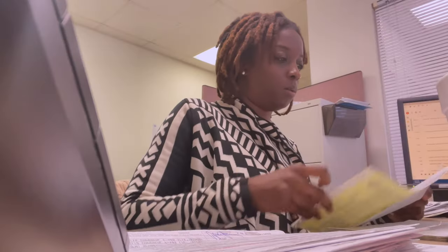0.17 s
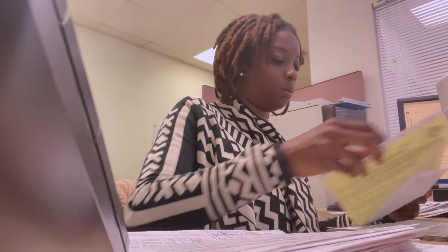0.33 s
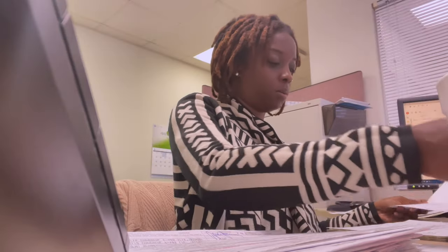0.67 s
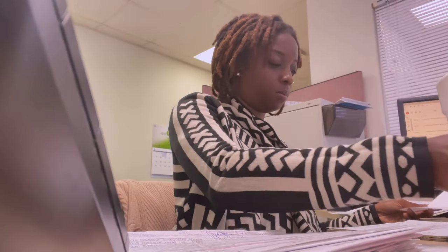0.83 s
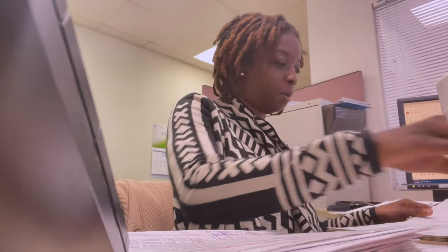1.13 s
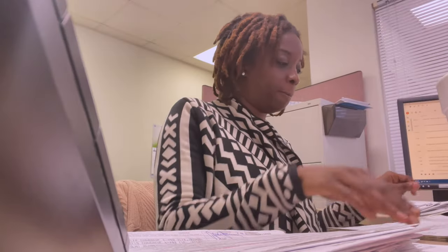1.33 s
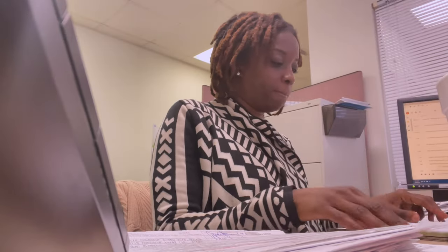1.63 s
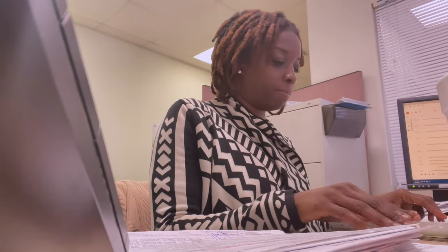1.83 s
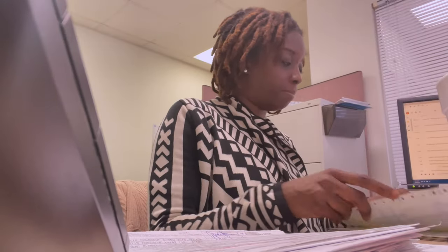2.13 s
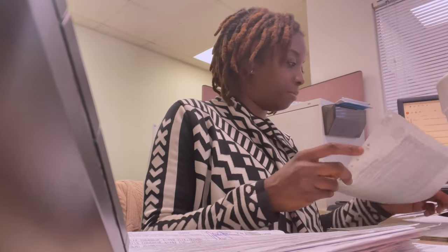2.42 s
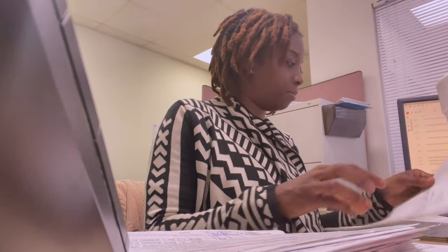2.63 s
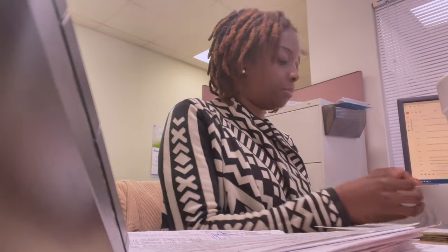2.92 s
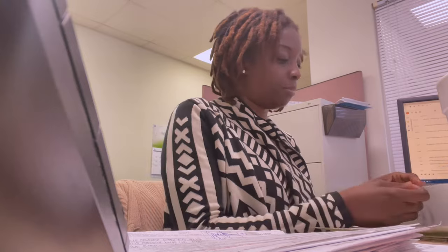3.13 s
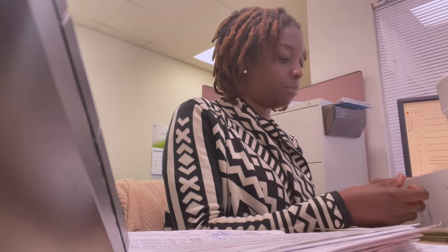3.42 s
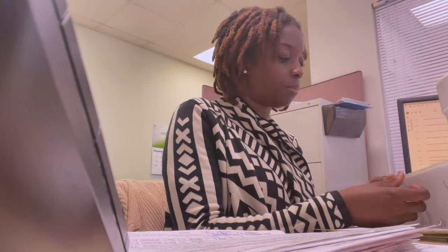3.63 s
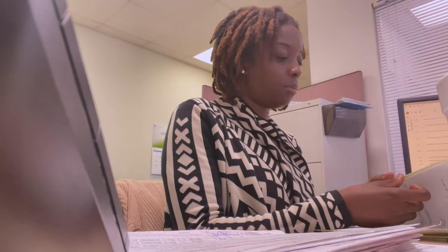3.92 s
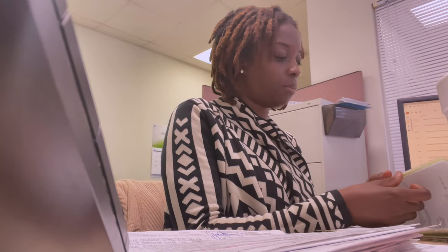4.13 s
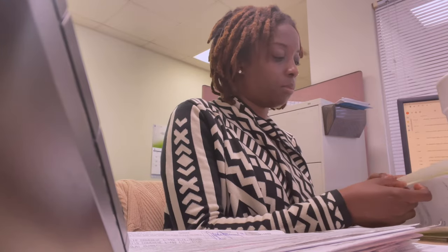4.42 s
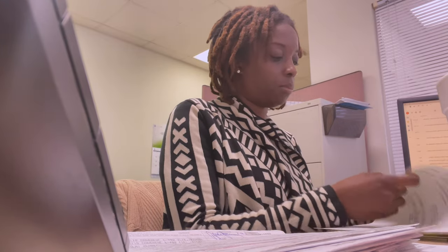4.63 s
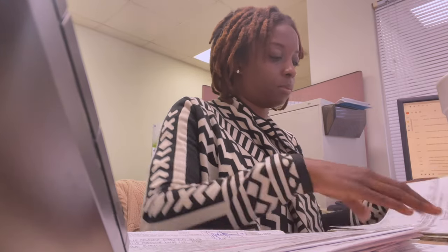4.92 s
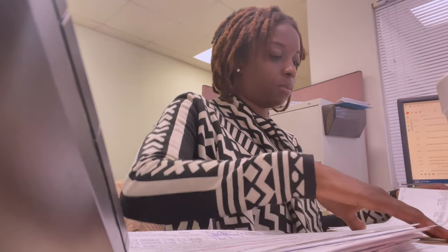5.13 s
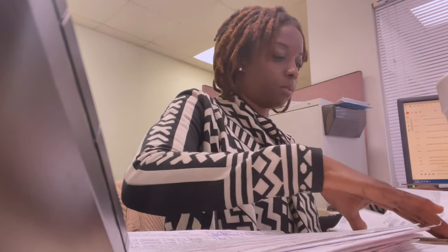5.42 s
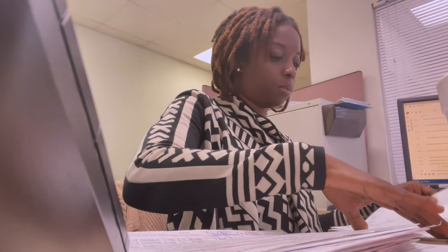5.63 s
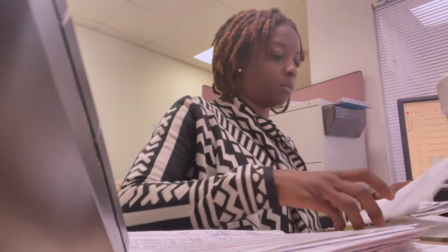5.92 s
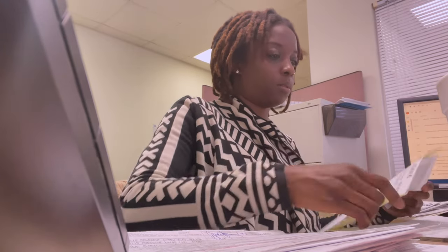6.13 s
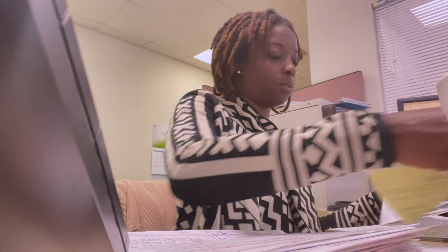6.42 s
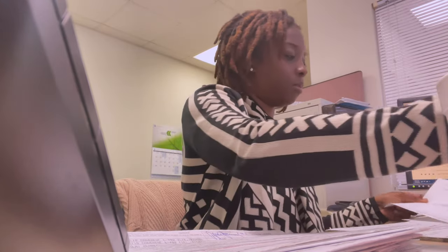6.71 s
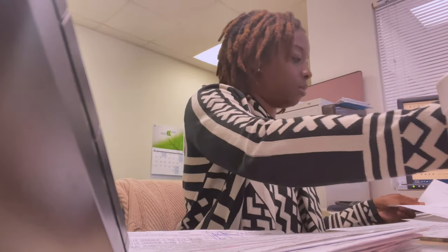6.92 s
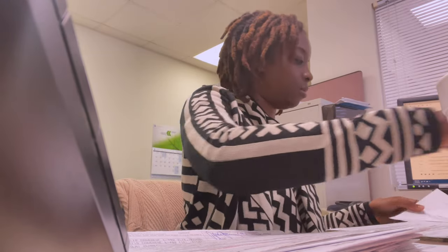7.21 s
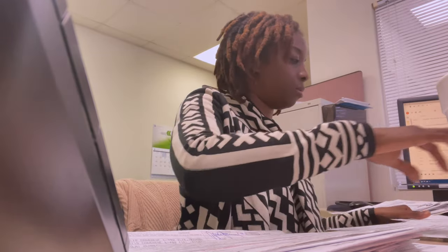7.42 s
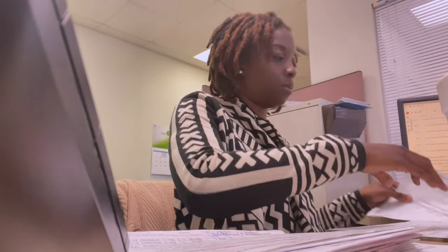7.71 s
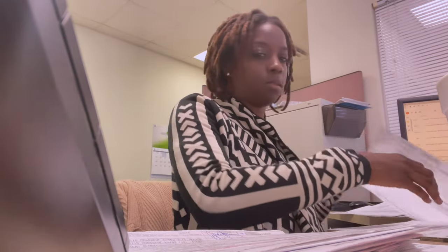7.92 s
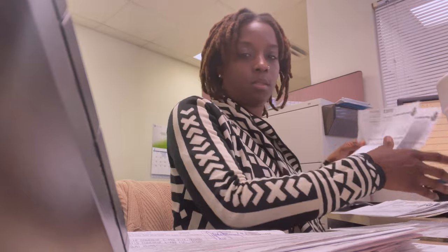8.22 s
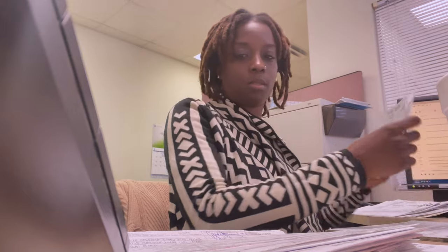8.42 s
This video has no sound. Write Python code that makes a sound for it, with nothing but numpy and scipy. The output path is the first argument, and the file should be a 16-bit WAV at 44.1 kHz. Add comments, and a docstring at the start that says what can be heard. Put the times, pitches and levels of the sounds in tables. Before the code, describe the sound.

Close dry rustling of papers being lifted and laid down, small taps and crease snaps, one loud stack thump, quiet office hum behind.

```python
"""Paper sheets, slid, lifted and dropped by hands on an office desk, close to a two-port microphone.
Filtered noise in sudden slips makes them crinkle, hiss and fizz, with the pile drumming under them;
short pulses make creases snap and edges tick, and the cubicle answers each with a short noise tail.
Once a sleeve sweeps over the desk; later a stack drops, and blows ring the damped modes of the pile.
Behind: ventilation as slowly breathing noise, mains hum and two far engines as drifting sines."""
import sys
import numpy as np
from scipy import signal
from scipy.fft import rfft, irfft, next_fast_len
from scipy.io import wavfile
from scipy.ndimage import uniform_filter1d

SR = 44100
rng = np.random.default_rng(int(sys.argv[2]) if len(sys.argv) > 2 else 0)


def transcribe(u):
    """Save the signal u as a 16-bit wav file named by the first command-line argument.

    u: samples, shape (n,) or (channels, n), limited to [-1, 1]; the rate is SR.
    q: integer samples, one column per channel.
    """
    v = np.clip(np.atleast_2d(u).T, -1, 1)
    q = np.round(v * 32767).astype(np.int16)
    wavfile.write(sys.argv[1], SR, q)


N = 377537

# Band limits between desk thud, pile drumming, crinkle, hiss and fine fizz: edge_hz
BAND_EDGES = [70, 250, 700, 2400, 5600, 15800]
# Colour of rubbed and bent paper: pitch_hz, density_db (per Hz, relative)
PAPER_COLOUR = [(60, 1.5), (250, -8), (420, -11), (560, -8), (900, -5.5), (2300, -14), (2900, -18),
                (4900, -20), (5900, -25.5), (7800, -27), (9000, -25.5), (11500, -26), (14000, -28),
                (15800, -31.5)]
# Broad resonances of the pile of sheets: pitch_hz, width_hz, lift_db
PILE_MODES = [(285, 30, 3), (378, 40, 10), (450, 40, 13), (650, 40, 3), (760, 30, 5)]
# Strokes of one sheet over another; rise and fall are the times for 20 dB:
# full_at_s, rise_s, hold_s, fall_s, hiss_db, fizz_db (re hiss), crinkle_db (re hiss)
STROKES = [(0.0, .05, 0, 0.18, -71.5, 1.5, -15), (0.188, 0.13, 0.26, 0.14, -62.5, -2, 0.5),
           (0.26, .01, 0, 0.073, -57.5, -14, -22), (0.53, .05, 0.032, 0.05, -70, -16, 13),
           (0.651, .005, 0, 0.046, -64.5, -2, -12), (0.671, 0.02, 0, 0.026, -49.5, -22, -20),
           (0.696, 0.075, 0.057, 0.12, -61.5, -7, -7), (0.93, .08, 0, 0.14, -66, -11, -3),
           (1.056, 0.11, 0.15, 0.075, -78, -11, 2), (1.153, .01, 0.0023, 0.053, -72.5, -3, 13),
           (1.184, 0.058, 0.037, 0.078, -74, -25, 4), (2.0, 0.14, 0.0085, 0.17, -59, -1, 1),
           (2.13, 0.19, 0.23, 0.035, -75.5, -3.5, 8.5), (2.32, 0.033, 0.015, 0.063, -76.5, -3, 18),
           (2.497, 0.036, 0.12, 0.033, -67.5, -6.5, 6.5), (2.773, 0.16, .02, 0.094, -72.5, 0, 14),
           (2.873, 0.024, 0.15, 0.058, -70, -2, 8), (3.215, 0.13, 0.061, 0.13, -76, -3.5, 5),
           (3.44, .12, 0.02, .05, -85, -9, 2), (3.42, .1, 0, 0.12, -88, -16, 5),
           (3.62, 0.037, 0.043, 0.13, -85, -19, 8), (4.15, 0.75, 0.0021, .4, -100, -1, 20.5),
           (4.435, 0.015, 0.1, 0.11, -73, 5.5, 12), (4.56, .02, 0.001, 0.044, -47.5, -25, 2),
           (4.624, .02, 0.06, 0.036, -68.5, -3, 14), (4.679, 0.14, 0.016, 0.034, -61, -2.5, 5),
           (4.755, 0.022, 0.049, 0.051, -72, 0, 13), (4.951, 0.045, 0.0024, 0.052, -81, -13, 18.5),
           (4.7, .03, 0.18, 0.62, -75, -1.5, 5.5), (5.022, 0.055, .06, 0.094, -72.5, 0, 5),
           (5.08, .004, 0, 0.069, -47, -0.5, -4), (5.158, .05, 0.11, 0.047, -70, -15, 4),
           (5.392, .004, 0, 0.065, -51.5, -14, -5), (5.711, 0.056, 0.0081, 0.16, -67.5, -4, 7),
           (5.8, 0.0091, 0.038, 0.066, -62.5, -21, -8), (6.047, 0.3, .04, .1, -73.5, -3, 6),
           (6.13, 0.068, 0.003, 0.049, -48, -4, -4.5), (6.179, .006, 0.026, 0.11, -56, -5.5, -5.5),
           (6.284, 0.029, 0.056, 0.086, -53, -1, -21), (6.4, 0.23, 0, 0.1, -70, -5, 15),
           (6.64, 0.18, 0, 0.19, -62, -4, -1), (7.001, 0.75, 0, 0.078, -73.5, -5, 0),
           (7.102, 0.054, 0.11, .05, -85, -0.5, 8.5), (7.236, .05, 0.0066, 0.1, -71.5, -1, -5),
           (7.492, 0.021, 0.076, .05, -67, -4.5, 5), (7.543, .005, 0.011, 0.076, -57.5, -2, 2),
           (7.586, 0.063, 0.055, 0.12, -66.5, 2.5, 0), (7.769, 0.13, 0.076, 0.13, -58, -1, 3.5),
           (7.908, 0.11, 0.025, .05, -57.5, -12, 4.5), (7.969, .004, 0.015, .04, -56, -14, -6),
           (8.0, .02, 0.0068, .12, -68, -15, 5), (8.14, 0.009, 0, 0.039, -76.5, -5, -11),
           (8.27, .05, 0.0025, 0.1, -76.5, -5, 6.5), (8.401, 0.067, 0, 0.24, -64, -2.5, 2.5)]
# Fingers and sheets landing softly on the pile: start_s, pile_db, thud_db (at full swell)
PATS = [(0.278, -57, -65), (0.35, -54, -68), (0.669, -59, -57), (0.94, -58.5, -58), (1.052, -57.5, -60),
        (1.2, -61, -52.5), (2.01, -61, -67), (2.39, -50, -51.5), (2.88, -49.5, -53), (3.611, -53.5, -61),
        (4.65, -66, -61), (5.08, -55, -60), (6.15, -49.5, -60), (6.21, -55.5, -61), (6.341, -49, -56),
        (6.4, -49, -57), (7.49, -55, -53), (7.8, -72, -56), (7.88, -66, -64), (7.989, -52.5, -67),
        (8.35, -65, -57)]
# Low rustle that runs under the strokes: start_s, pile_db, thud_db
LOW_RUSTLE = [(0.0, -69.5, -79), (0.64, -65.5, -63), (2.31, -71, -82), (2.55, -59.5, -72),
              (3.29, -71, -61.5), (4.0, -70, -74.5), (4.72, -73, -74), (5.43, -70, -81), (5.58, -68, -65),
              (5.79, -60.5, -65), (6.29, -63.5, -61), (6.72, -65, -76), (7.39, -66.5, -72.5),
              (7.8, -57, -53.5), (8.13, -70, -70), (8.56, -63.5, -61.5)]
# The stack is dropped and settles: start_s, thud_db, pile_db, crinkle_db, hiss_db, fizz_db
DROP = [(5.44, -63.5, -39.5, -48.5, -49, -46.5), (5.452, -55.5, -45.5, -60.5, -44, -39),
        (5.496, -54.5, -38, -45.5, -31, -38.5), (5.524, -48, -32.5, -29, -34, -38.5),
        (5.584, -44.5, -43, -47.5, -43, -47), (5.636, -57, -52.5, -58, -59, -66),
        (5.72, -53, -59, -55, -65, -76)]
# Stereo width of the noises, wide up to about 8 kHz, nearly mono at the top: pitch_hz, side_db (re mid)
SIDE_LEVEL = [(60, -13), (110, -2), (200, -2.5), (380, -2.5), (700, 0), (1290, 1), (2380, -1.5), (4400, 0),
              (8120, 6.5), (15000, -27.5)]
# Phase of the tied part of the side against the mid: pitch_hz, turn_radians
SIDE_TURN = [(100, 4.2), (400, 4.85), (1500, 4.58), (8000, 4.65)]
# Colour of the ventilation: pitch_hz, density_db (per Hz, relative)
AIR_COLOUR = [(15, -35.5), (25, -8), (64, 14), (123, -12), (157, -10), (205, -21.5), (371, -12.5),
              (542, -27), (1060, -29.5), (1640, -48), (7830, -58.5), (10800, -58), (15800, -66)]
# Drones of two distant engines, before the left-right balance: start_s, pitch_hz, level_db
ENGINE = [(0.0, 47.5, -57), (0.7, 46.3, -60.5), (1.52, 47.73, -56), (2.31, 47.2, -54.5),
          (3.1, 49.85, -52.5), (3.5, 50.8, -56.5), (4.0, 53, -51), (4.5, 55.3, -50), (4.62, 55.26, -45.5),
          (5.6, 56.26, -48), (6.2, 55.7, -57.5), (6.45, 55, -53.5), (6.77, 50.3, -49.5), (7.05, 48.36, -63),
          (7.6, 46.8, -65), (7.8, 48.2, -53.5), (8.1, 46.4, -66), (8.56, 46.4, -60)]
ENGINE_TWO = [(5.9, 74.4, -79), (6.2, 77.6, -61), (6.69, 79.05, -55), (6.87, 82, -63), (7.11, 81.4, -53),
              (7.35, 83, -59), (8.2, 82.2, -58.5), (8.56, 81.0, -57)]
# Creases snapping and fingers tapping: start_s, level_db, pitch_hz, bite_db (re level)
SNAPS = [(0.129, -41.5, 2270, -15), (0.262, -36, 1010, 2), (0.356, -35.5, 1220, -1),
         (0.671, -38.5, 850, -14), (0.927, -46, 980, -22), (1.057, -58, 750, -25), (1.184, -48, 790, -3),
         (1.773, -49, 947, -6), (2.029, -42.5, 1050, 4.5), (2.314, -48, 815, -22), (2.358, -46, 930, -21),
         (2.384, -33.5, 1030, -5.5), (2.405, -37.5, 1300, 1), (2.457, -41, 1040, -19),
         (2.504, -34.5, 1190, -3), (2.536, -28, 1427, -16), (2.599, -43.5, 760, -1), (2.647, -40, 780, -5),
         (2.758, -46, 970, -16), (2.791, -39.5, 960, -2), (2.88, -24.5, 1100, -10.5),
         (2.987, -43, 1260, -27), (3.02, -38.5, 1220, -27), (3.485, -46.5, 1080, 0),
         (3.604, -33.5, 960, -14), (3.63, -42, 1420, 3), (3.92, -47.5, 851, -30), (4.086, -45.5, 960, -14),
         (4.431, -51, 1325, -29), (4.489, -47, 1230, -29), (4.548, -24.5, 1840, -25),
         (4.625, -37, 1150, -4), (4.678, -47, 1280, -3), (4.76, -40.5, 1100, -7), (4.931, -47.5, 1060, -24),
         (5.078, -31.5, 1624, -12), (5.181, -48, 1052, -12.5), (5.244, -39.5, 2310, -11),
         (5.392, -31, 1700, -4), (5.446, -25.5, 1360, -13), (5.474, -23, 1513, -9),
         (5.487, -16.5, 2144, 1.5), (5.494, -16.5, 1548, -15), (5.681, -41.5, 1183, 7),
         (5.802, -36.5, 1358, 5.5), (6.072, -46, 805, 5), (6.13, -36, 1360, -26), (6.177, -36.5, 1670, 1.5),
         (7.224, -43, 1477, -5), (7.504, -43.5, 1130, -1), (7.539, -42.5, 907, -5),
         (7.732, -38.5, 1244, -10), (7.914, -42, 1475, 1.5), (7.967, -30.5, 1050, 3)]
# Thin edges flicking free: start_s, level_db
TICKS = [(0.919, -55), (1.0934, -47), (1.939, -36.5), (2.382, -46), (2.5027, -50), (3.0185, -50),
         (3.8672, -47.5), (3.998, -46.5), (4.0855, -37.5), (4.2617, -47.5), (4.4303, -47), (4.4862, -45),
         (4.5366, -28), (5.0803, -18.5), (5.3918, -36.5), (5.446, -19), (5.8021, -41), (6.077, -46),
         (6.276, -41), (6.582, -50), (7.4847, -42), (7.5396, -46), (7.9674, -48), (8.139, -59),
         (8.253, -59.5)]
# Colour of a sleeve on paper and desk: pitch_hz, density_db (per Hz, relative)
SLEEVE_COLOUR = [(60, -4), (130, -6), (250, -11.5), (330, -3), (520, -10), (900, -15.5), (1500, -29),
                 (2500, -16.5), (3700, -14), (5200, -27), (7800, -37.5), (11500, -22), (13500, -35),
                 (15800, -38)]
# An arm, then the falling stack strike the pile: start_s, drive_db (mode lifts come on top)
BLOWS = [(1.474, -54), (5.474, -42), (5.5, -32), (5.5133, -33), (5.5242, -31)]

ALIKE = 0.43  # amplitude share of the side that follows from the mid
CURL = 1.037  # exponent: swells round off at the top and steepen towards silence
PILE_STROKE_DB, DESK_STROKE_DB = -5.5, -1.5  # pile and desk drum under a stroke, re its crinkle
PILE_SNAP_DB, DESK_SNAP_DB = -29.5, -36  # and under a snap, re its level
DRUM_RISE_S, DRUM_FALL_S = 0.051, 0.12  # times for 20 dB
PAT_RISE_S, PAT_FALL_S = 0.02, 0.1  # times for 20 dB
AIR_DB, AIR_RUMBLE_DB = -64, -59
MAINS_HZ, MAINS_DB = 120, -57.5
BACKGROUND_PAN_DB, SNAP_PAN_DB, BLOW_PAN_DB = -2, -1.5, -3  # left minus right
LEFT_LAG_S = .0001  # the right port is nearer the hands
BITE_HZ, TICK_HZ = 2430, 9120
SNAP_TAIL_DB, SNAP_T60_S = -21, 0.082  # gain and decay of the scatter after a snap
TICK_TAIL_DB, TICK_T60_S = -21.5, 0.044
# Bells of the sleeve's sweep: middle, level there, time to fall 20 dB
SWEEP_S, SWEEP_DB, SWEEP_HALF_S = 1.535, -53.5, 0.19  # hiss
SHEEN_S, SHEEN_DB, SHEEN_HALF_S = 1.55, -56, 0.14  # highest hiss, only at full speed
RUMBLE_S, RUMBLE_DB, RUMBLE_HALF_S = 1.541, -39.5, 0.11  # desk top
BLOW_CONTACT_S = .004  # the air between the sheets cushions each blow
TOP_HZ = 15780

T = np.arange(N) / SR
COARSE_T = T[::64]  # enough for slow gains
HZ = np.maximum(np.fft.rfftfreq(next_fast_len(N), 1 / SR), 1)


def undb(db):
    """Amplitude of a level in dB."""
    return 10 ** (np.asarray(db) / 20)


def gain(table):
    """Gain at every frequency, interpolated in dB over log frequency."""
    hz, db = np.transpose(table)
    return undb(np.interp(np.log(HZ), np.log(hz), db))


def band(lo_hz, hi_hz, order=4):
    """Gain of a steep band-pass."""
    low_cut = 1 + (lo_hz / HZ) ** (2 * order)
    high_cut = 1 + (HZ / hi_hz) ** (2 * order)
    return 1 / np.sqrt(low_cut * high_cut)


def play(table):
    """Columns of a curve table at every sample."""
    s, *columns = np.transpose(table)
    return [np.interp(T, s, column) for column in columns]


def balance(pan_db):
    """Left and right gains for a level difference, left minus right."""
    return undb([[pan_db / 2], [-pan_db / 2]])


def walk(rate):
    """Random levels held 1 / rate s and slewed twice; spread near 1."""
    hold = int(SR / rate)
    steps = np.repeat(rng.standard_normal(N // hold + 1), hold)
    slewed = uniform_filter1d(uniform_filter1d(steps, hold), hold)
    return 1.3 * slewed[:N]


def wide(envelope, colour):
    """Coloured stereo noise, mid RMS 1: the side is partly tied to the mid, partly diffuse."""
    size = next_fast_len(N)
    mid, diffuse = rfft(envelope * rng.standard_normal((2, N)), size) * colour
    hz, turn = np.transpose(SIDE_TURN)
    tied = mid * np.exp(1j * np.interp(np.log(HZ), np.log(hz), turn))
    side = gain(SIDE_LEVEL) * (ALIKE * tied + np.sqrt(1 - ALIKE ** 2) * diffuse)
    mid, side = irfft([mid, side], size)[:, :N]
    return np.array([mid + side, mid - side]) / np.std(mid)


def reflections(x, t60, db, hold_s, count=5):
    """Early bounces off desk and screens; patterns crossfade in a steady cycle, so the patchy colour shifts."""
    t = np.arange(int(.1 * SR)) / SR
    paths = undb(db - 60 * t / t60) * rng.standard_normal((count, len(t)))
    paths[:, 0] = 1  # direct sound
    paths /= np.sqrt(np.sum(paths ** 2, axis=1, keepdims=True))
    place = T / hold_s % count
    out = 0
    for k, path in enumerate(paths):
        away = np.minimum(abs(place - k), abs(place - k - count))
        crossfade = np.cos(np.pi / 2 * np.minimum(away, 1))
        out = out + crossfade * signal.fftconvolve(x, path[None])[:, :N]
    return out


def slips(rate, spread_db, decay_s):
    """Envelope of stick-slip: sudden random jumps, mostly small, that die away."""
    sizes = undb(np.minimum(spread_db * rng.exponential(size=N), 24))
    jumps = (rng.random(N) < rate / SR) * sizes
    return signal.lfilter([1], [1, -np.exp(-1 / (decay_s * SR))], jumps)


def swell(s, rise_s, hold_s, fall_s):
    """Coarse gain of a rise, hold and fall that run nearly straight in dB."""
    early = (s - COARSE_T) / rise_s
    late = (COARSE_T - s - hold_s) / fall_s
    return undb(-20 * np.clip(np.maximum(early, late), 0, 6) ** CURL)


def handling():
    """Gains of thud, pile, crinkle, hiss and fizz; all movements of the paper add in power."""
    power = 0
    for s, rise_s, hold_s, fall_s, hiss_db, fizz_db, crinkle_db in STROKES:
        thud_db, pile_db = crinkle_db + DESK_STROKE_DB, crinkle_db + PILE_STROKE_DB
        share = undb([thud_db, pile_db, crinkle_db, 0, fizz_db])
        stroke = undb(hiss_db) * swell(s, rise_s, hold_s, fall_s)
        power = power + np.outer(share, stroke) ** 2

    # snaps and pats drum only on desk and pile
    knocks = sum((undb(db) * swell(s, DRUM_RISE_S, 0, DRUM_FALL_S)) ** 2 for s, db, *_ in SNAPS)
    power[:2] += np.outer(undb([DESK_SNAP_DB, PILE_SNAP_DB]) ** 2, knocks)
    for s, pile_db, thud_db in PATS:
        pat = swell(s, PAT_RISE_S, 0, PAT_FALL_S)
        power[:2] += np.outer(undb([thud_db, pile_db]), pat) ** 2

    power = np.array([np.interp(T, COARSE_T, p) for p in power])
    pile_db, thud_db = play(LOW_RUSTLE)
    power[:2] += undb([thud_db, pile_db]) ** 2
    dropping = (T > DROP[0][0]) * (T < DROP[-1][0])
    power += dropping * undb(play(DROP)) ** 2
    return np.sqrt(power)


def rustle():
    """Fibres catch and let go: bending and rubbing share the slips; the pile rings in broad modes."""
    shared = slips(rate=300., spread_db=4.0, decay_s=0.001)
    mode_db = sum(db / (1 + (2 * (HZ - hz) / width) ** 2) for hz, width, db in PILE_MODES)
    paper = gain(PAPER_COLOUR) * undb(mode_db)
    steady = [6.4, 5.2, 1.2, 2.1, 2.4]  # smooth rubbing under the slips, from thud up to fizz
    layers = []
    for level, smooth, lo, hi in zip(handling(), steady, BAND_EDGES, BAND_EDGES[1:]):
        envelope = (smooth + shared) * undb(1.9 * walk(25))
        layers.append(level * wide(envelope, paper * band(lo, hi)))
    thud, pile, *sheets = layers
    return thud + pile + reflections(sum(sheets), t60=.05, db=-21, hold_s=.09)


def drone(table, waver_db):
    """A low engine order: a sine that drifts in pitch and wavers in level."""
    s, hz, db = np.transpose(table)
    level_db = np.interp(T, s, db, left=-120) + waver_db * walk(4.1)
    phase = 2 * np.pi * np.cumsum(np.interp(T, s, hz)) / SR
    return np.sqrt(2) * undb(level_db) * np.sin(phase)


def office():
    """Ventilation noise that breathes slowly, whole and in the bass, with mains hum and far engines."""
    air = gain(AIR_COLOUR)
    whole = undb(AIR_DB) * wide(undb(1.5 * walk(5)), air * band(130, 16000, order=6))
    rumble = undb(AIR_RUMBLE_DB) * wide(undb(1.5 * walk(2.4)), air * band(28, 200, order=6))
    mains = np.sqrt(2) * undb(MAINS_DB + 0.4 * walk(8.5)) * np.sin(2 * np.pi * MAINS_HZ * T)
    engines = drone(ENGINE, waver_db=1.5) + drone(ENGINE_TWO, waver_db=0.5)
    return (whole + rumble + mains + engines) * balance(BACKGROUND_PAN_DB)


def hits(rows, pan_db, tail_db, t60, cycles, late_db, delay_s, dull_hz):
    """Short pulses; desk and partitions return a dense scatter, the office a fainter late tail."""
    out = np.zeros((2, N + SR))
    t = np.arange(int(.4 * SR)) / SR
    felt = signal.butter(6, dull_hz, fs=SR, output="sos")  # soft partitions swallow the treble
    near = np.arange(-128, 128) / SR
    build_up = 1 - np.exp(-(t / delay_s) ** 2)
    scatter = build_up * (undb(-60 * t / t60) + undb(late_db - 60 * t / 0.39))
    for s, db, hz, bite_db in rows:
        common, *own = signal.sosfilt(felt, rng.standard_normal((3, len(t))))
        for ear, sign in enumerate((1, -1)):  # left, right
            u = near - (LEFT_LAG_S if sign > 0 else 0)
            body, bite = (np.cos(2 * np.pi * f * u + .6) * np.exp(-(2 * f * u / cycles) ** 2)
                          for f in (hz, BITE_HZ))
            echo = undb(tail_db) * scatter * (0.61 * common + 0.88 * own[ear])
            # the crease keeps crackling for a moment, so the tail holds more bite than the first pulse
            sound = signal.fftconvolve(body + undb(bite_db + 2) * bite, echo)
            sound[:len(u)] += body + undb(bite_db) * bite
            at = int((s + .0008) * SR)  # the pulse peaks just after its onset
            out[ear, at:at + len(sound)] += undb(db + sign * pan_db / 2) * sound
    return out[:, 128:N + 128]  # pulses are centred on sample 128


def snaps():
    """Dull snaps of creases, and bright ticks of edges."""
    ticks = [(s, db, TICK_HZ, -12) for s, db in TICKS]
    dull = hits(SNAPS, SNAP_PAN_DB, SNAP_TAIL_DB, SNAP_T60_S,
                cycles=1.1, late_db=-17.5, delay_s=0.0014, dull_hz=2500)
    bright = hits(ticks, 0, TICK_TAIL_DB, TICK_T60_S,
                  cycles=0.64, late_db=-16.5, delay_s=.0025, dull_hz=13000)
    return dull + bright


def bell(s, db, half_s):
    """Gain that swells and fades as a bell, 20 dB down half_s from its middle."""
    return undb(db - 20 * ((T - s) / half_s) ** 2)


def sweep():
    """Cloth on paper hisses smoothly; the desk top rumbles more unevenly under the arm."""
    cloth = gain(SLEEVE_COLOUR)
    hiss = wide(undb(.6 * walk(40)), cloth * band(1500, 7800))
    sheen = wide(undb(.6 * walk(40)), cloth * band(7800, 16000))
    rumble = wide(undb(1.5 * walk(60)), cloth * band(50, 1500))
    hiss = bell(SWEEP_S, SWEEP_DB, SWEEP_HALF_S) * hiss
    sheen = bell(SHEEN_S, SHEEN_DB, SHEEN_HALF_S) * sheen
    rumble = bell(RUMBLE_S, RUMBLE_DB, RUMBLE_HALF_S) * rumble
    return reflections(hiss + sheen, t60=.05, db=-22, hold_s=.07) + rumble


def blows():
    """Cushioned pushes that ring the modes of the pile, neighbours in opposite phase."""
    t = np.arange(int(.3 * SR)) / SR
    ring = 0
    for k, (hz, width, db) in enumerate(PILE_MODES):
        decay = np.exp(-np.pi * width * t)
        ring = ring + (-1) ** k * undb(db) * np.sin(2 * np.pi * hz * t) * decay
    ring = ring * (1 - np.exp(-(t / BLOW_CONTACT_S) ** 2))
    out = np.zeros(N)
    for s, db in BLOWS:
        at = int(s * SR)
        out[at:at + len(ring)] += undb(db) * ring
    return out * balance(BLOW_PAN_DB)


def scene():
    """Paper close to the microphone, with the office behind."""
    return rustle() + office() + snaps() + sweep() + blows()


def record(dry):
    """The recorder cuts the top with a steep elliptic low-pass."""
    return signal.sosfilt(signal.ellip(10, .2, 80, TOP_HZ, fs=SR, output="sos"), dry)


dry = scene()
out = record(dry)
transcribe(out)
```